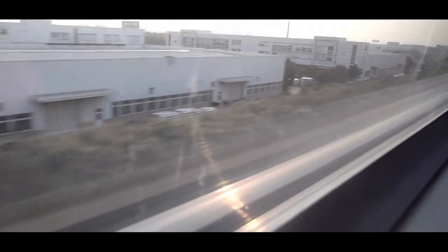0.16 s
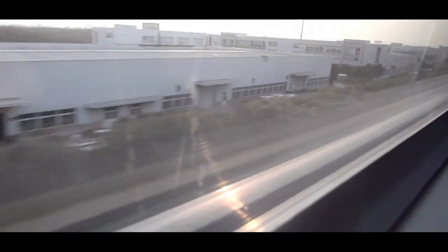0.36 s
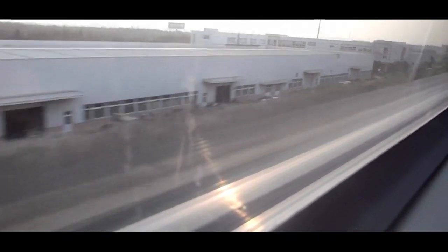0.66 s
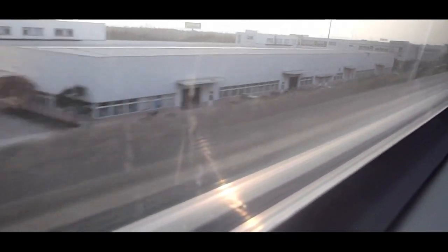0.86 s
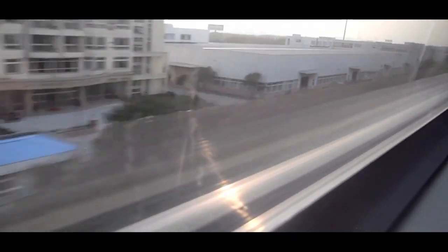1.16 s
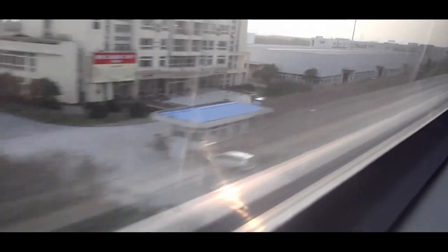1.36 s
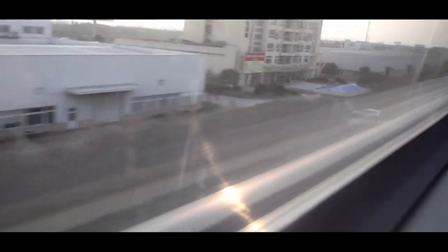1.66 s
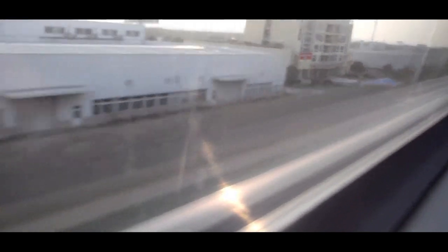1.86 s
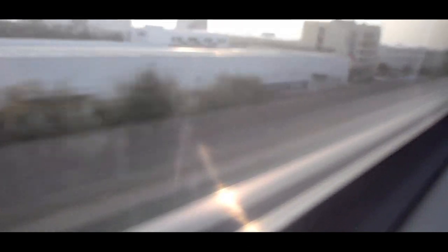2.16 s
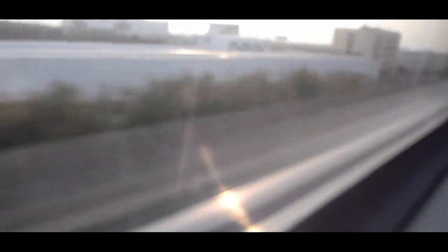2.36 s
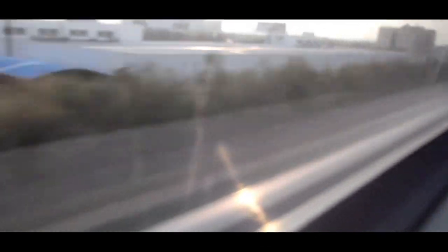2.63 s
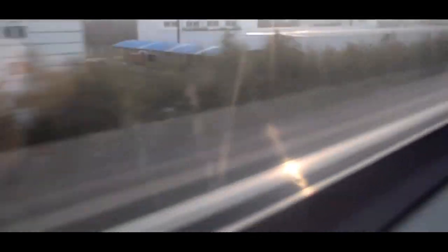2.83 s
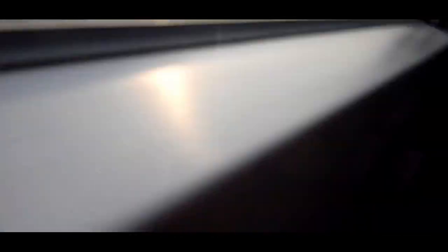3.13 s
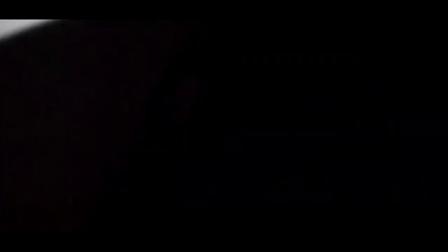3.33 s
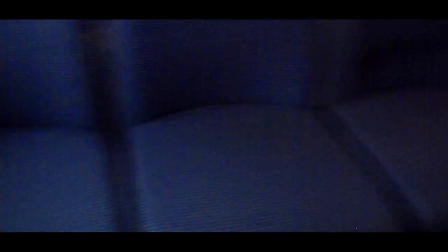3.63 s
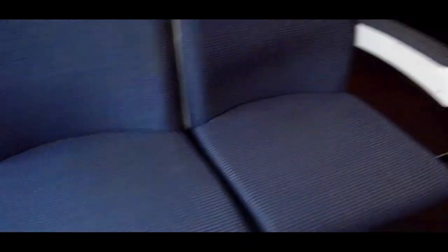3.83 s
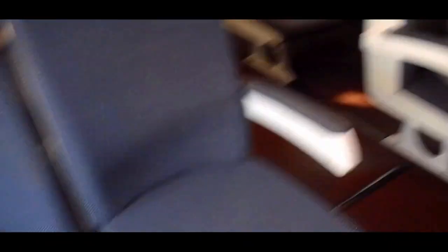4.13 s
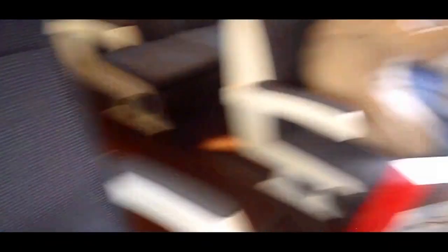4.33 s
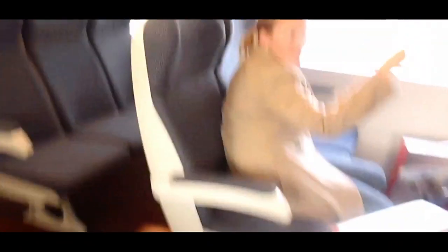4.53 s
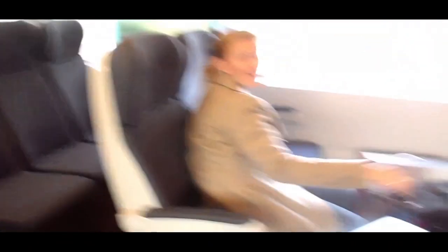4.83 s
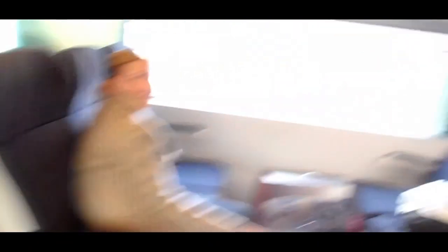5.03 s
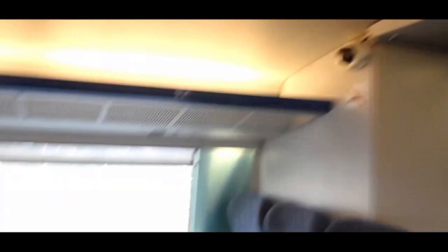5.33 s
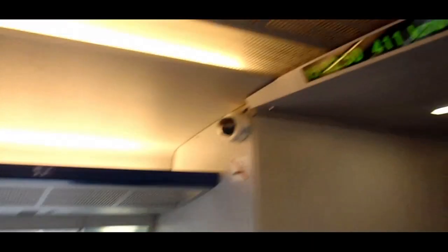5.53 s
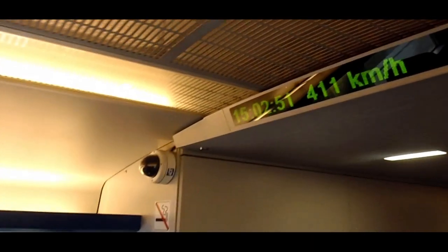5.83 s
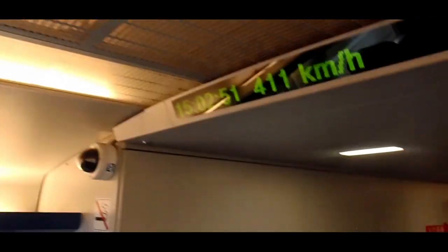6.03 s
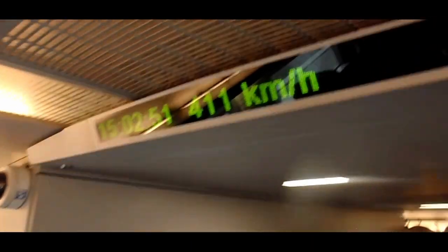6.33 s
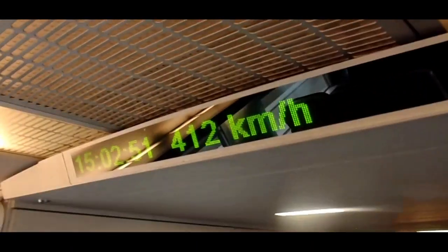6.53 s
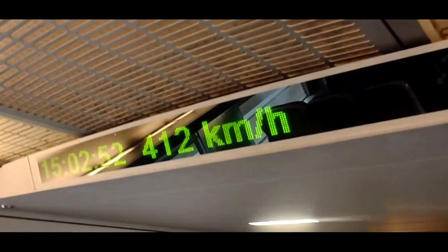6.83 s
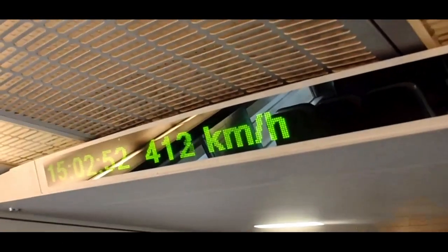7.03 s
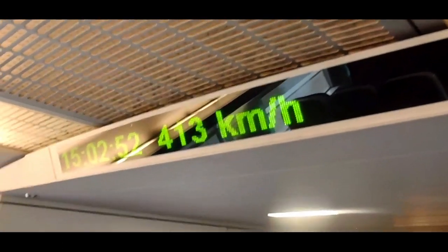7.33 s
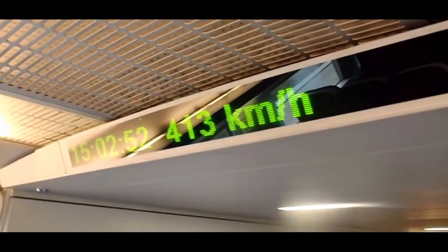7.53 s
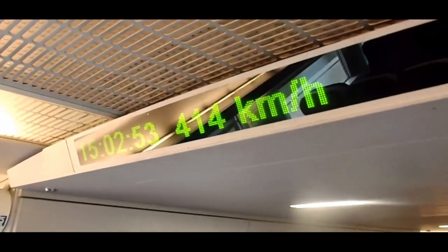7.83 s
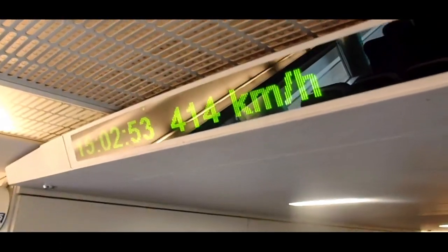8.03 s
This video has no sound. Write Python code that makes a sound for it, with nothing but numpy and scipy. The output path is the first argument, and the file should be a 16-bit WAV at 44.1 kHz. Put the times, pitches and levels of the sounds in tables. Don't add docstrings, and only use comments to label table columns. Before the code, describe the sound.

A close handheld microphone in an enclosed train cabin picks up heavy, bass-rich turbulence with quick small gusts. A faint steady tone climbs very slightly. Midway the hand shifts, causing scattered plastic snaps, creaks and a dull bump, and the roar is briefly muffled behind a seat. Afterwards handling fades, leaving rush, rumble and a stronger beating fan whine, with faint seat squeaks. Nobody speaks.

```python
import sys
import numpy as np
from scipy import signal
from scipy.fft import rfft, irfft, next_fast_len
from scipy.io import wavfile
from scipy.ndimage import uniform_filter1d

SR = 44100
rng = np.random.default_rng(int(sys.argv[2]) if len(sys.argv) > 2 else 0)


def field_ratio(decibels):
    return 10 ** (np.asarray(decibels, dtype=float) / 20)


def put_to_file(sound):
    columns = np.atleast_2d(sound).T
    safe = np.clip(columns, -1, 1)
    whole_steps = np.round(safe * 32767)
    wavfile.write(sys.argv[1], SR, whole_steps.astype(np.int16))


N = 360738
SIZE = next_fast_len(N)
HZ = np.fft.rfftfreq(SIZE, 1 / SR) + 1e-3
TIME = np.arange(N) / SR

# time_s, aisle_share
TURN = [
    (0, 0.05),
    (2.3, 0.06),
    (3.2, 0.2),
    (3.7, 0.44),
    (5.6, 0.86),
    (6.2, 0.91),
    (8.18, 0.8),
]
# pitch_hz, level_db (per Hz)
HULL_COLOUR = [(24, -27), (40, -11), (62, 0.5), (95, 0), (141, -6.5), (190, -6), (300, -11.5), (674, -27),
               (1100, -34), (2000, -46), (3800, -48), (4900, -69), (8000, -84), (15000, -106)]
AIR_HZ = (110, 550, 1800, 3700)
AISLE_CHANGE_DB = (-0.5, 1, 8, 5)
GUST_SHARE = (0.73, 0.97, 0.17, 0.75)
# middle_s, change_db, length_s
GUSTS = [(0.183, 5.5, .06), (0.619, 3, 0.13), (0.861, 4, 0.071), (0.949, 0, 0.42), (3.207, 0, 0.56),
         (4.049, 1, .25), (6.142, -1, .2), (1.121, 4, 0.11), (1.906, 5, 0.054), (2.118, -0.5, .1),
         (2.36, 6, .02), (2.69, 2.5, 0.14), (2.851, -5, .05), (.28, 2, .04), (0.386, 1.5, 0.036),
         (5.54, 3, 0.026), (7.755, 5, .02), (2.974, 2, 0.082), (3.331, 0.5, 0.076), (3.541, -6, 0.12),
         (3.844, 7.5, .06), (4.197, -3.5, 0.04), (4.636, 1.5, 0.026), (4.954, 1, .1), (5.288, -2, .15),
         (5.763, 4, 0.13), (5.854, 3, 0.021), (5.976, -3.5, 0.36), (6.437, 3.5, 0.089),
         (6.889, -5.5, 0.047), (6.959, 2, 0.091), (7.219, 2, 0.042), (7.44, 0, 0.039), (7.502, -7, 0.058),
         (7.695, 1, 0.085), (7.94, -2.5, .06)]
# middle_s, pitch_hz, change_db, length_s
LOCAL_SWELLS = [(.05, 200, -5, .2), (.36, 90, 10, .2), (.55, 115, -5, .12), (1.3, 190, -3, .3),
                (4.03, 90, -4, .15), (5.9, 200, -3, .2), (5, 1500, 2, .15), (.5, 450, -3, .2), (.8, 700, 3, .4),
                (1.65, 110, 4, .2), (2.03, 1300, -5, .15), (2.3, 160, 4, .5), (2.6, 105, -6, .8),
                (3.02, 65, 6, .15), (3.2, 450, -5, .5), (3.3, 190, -3, .15), (3.35, 105, 5, .3),
                (3.6, 300, 4, .2), (3.98, 200, 5, .3), (3.95, 1700, 2, .4), (4.5, 330, 4, .3), (4.5, 170, -3, .3),
                (4.9, 290, 3, .2), (4.8, 70, -3, .3), (4.9, 700, -3, .2), (5.1, 170, 3, .5), (5.3, 115, -5, .2),
                (5.3, 700, -3, .2), (5.55, 70, 3, .3), (5.6, 280, -1, .3), (6.25, 70, -4, .35),
                (6.75, 220, -3, .4), (7, 70, 4, .3), (7.1, 300, 4, .3), (7.1, 2500, 3, .35), (7.4, 180, -4, .4),
                (7.5, 700, -2, .2), (7.75, 65, -4, .4), (7.9, 250, 4, .2)]
# pitch_hz, width_hz, window_db, aisle_db
PANES = [(109.9, 10, -30, -26.5), (175.2, 30, -31, -44.5), (261, 32, -42, -33.5), (1700, 480, -59.5, -58),
         (477, 140, -50, -44.5), (1200, 90, -67.5, -49), (4370, 590, -86.5, -67), (2780, 380, -54, -85.5),
         (5600, 830, -84.5, -76), (2340, 130, -83, -72), (3546, 500, -68, -55), (7750, 300, -94, -97),
         (11700, 150, -100, -102)]
SLOT_HZ = (650.5, 673)
# middle_s, tone_db, octave_db
SLOT_SWELLS = [
    (1.8, -11.5, -1.5),
    (3.35, -1.5, 12.5),
    (3.799, 8, 3),
    (4.701, -4, 9.5),
    (5.67, 5, 13.5),
    (6.0, 8, 5),
    (7.25, 1.5, 3.5),
    (7.75, 2, 8.5),
]
# middle_s, level_db (over steady)
THUMPS = [(.5, -5), (1.2, -4), (1.41, -8), (1.95, 3.5), (2.46, 5), (3.05, 4), (3.75, 8), (3.96, 11.5),
          (4.8, 5), (5.22, 23), (5.88, 9), (6.3, 2), (7.2, 5), (7.45, 8)]
# time_s, level_db
FAN_LEVEL = [(0, -49.5), (.8, -47), (1.9, -53), (2.4, -46), (3.1, -55), (3.44, -50), (3.53, -56),
             (3.65, -52), (3.8, -50), (4.07, -46), (4.3, -44), (5.2, -46), (5.61, -44), (5.75, -38),
             (6.45, -34), (7.45, -36), (8.11, -35), (8.18, -47)]
# pitch_hz, wander_hz, window_db, aisle_db
FAN_LINES = [(1073, 3, 1, -24), (1082, 4, -10, -5), (1094, 3, -4, 0), (1105, 4, -4, -6), (1117, 4, -12, -2),
             (1129, 5, -16, -11), (1143, 5, -20, -20)]
# middle_s, length_s, pitch_hz, level_db
STANDOUTS = [(.3, .25, 1080, -48), (.8, .3, 1082, -47), (1.25, .3, 1080, -46), (2.3, .2, 1085, -48),
             (3.3, .15, 1065, -46), (3.43, .14, 1075, -42), (3.65, .11, 1101, -39), (4.03, .26, 1106, -41),
             (4.05, .34, 1080, -42), (4.2, .12, 1075, -45), (4.55, .2, 1090, -45), (4.58, .15, 1122, -47),
             (4.77, .2, 1075, -46), (4.8, .2, 1135, -48), (4.92, .06, 1120, -43), (5.33, .12, 1130, -45),
             (5.44, .08, 1097, -45), (5.7, .08, 1100, -41), (6.4, .3, 1095, -40), (6.2, .2, 1120, -37),
             (6.93, .25, 1095, -37), (7.1, .1, 1115, -39), (7.35, .2, 1115, -40), (7.25, .2, 1088, -42),
             (7.74, .1, 1105, -35), (8.05, .2, 1095, -41)]
# pitch_hz, width_hz, window_db, aisle_db
CIRCUIT = [(12900, 200, -108, -108), (15680, 60, -108, -108), (11800, 600, -101, -101),
           (9800, 2500, -100, -100)]
# time_s, level_db
GRIP = [(0, -81.5), (2.3, -78.5), (2.45, -74), (3.05, -75), (3.2, -74.5), (3.6, -82), (4.1, -69),
        (4.3, -74), (4.7, -72.5), (5.1, -72), (5.45, -68), (5.8, -76), (6.4, -72), (6.8, -82), (8.18, -85)]
# start_s, level_db
THUDS = [
    (0.163, -9),
    (2.699, -7),
    (5.84, -3.5),
]
# start_s, peak_db, pitch_hz
TICKS = [(0.185, -56, 5500), (0.4052, -62.5, 5500), (2.4164, -57, 6000), (2.4714, -65, 6500),
         (2.5017, -49, 4600), (2.592, -62, 7300), (2.592, -50, 4000), (3.0175, -58, 4600),
         (2.7157, -61, 6500), (3.0175, -59, 6500), (3.3134, -61, 6500), (3.6287, -62, 6500),
         (3.6704, -65, 6500), (3.8651, -56, 6500), (4.157, -65, 7000), (4.2403, -44, 5000),
         (4.3046, -53, 4700), (4.3103, -51, 4700), (4.6658, -59, 5700), (4.6947, -60, 5700),
         (5.2036, -60, 5800), (5.3707, -46, 4800), (5.4534, -55, 6000), (5.5363, -57, 5500),
         (6.0945, -67, 6000), (6.2063, -53, 6000), (6.3504, -61, 6000), (6.5585, -55, 6500)]
# start_s, peak_db, top_hz
SNAPS = [(0.186, -58, 9000), (2.5017, -62, 9000), (2.9834, -38, 13000), (3.8654, -57, 8000),
         (4.1572, -62, 8500), (4.2405, -66, 13000), (4.255, -54, 9000), (4.3044, -59, 12500),
         (4.3103, -57, 12500), (4.6656, -69, 10000), (5.118, -68, 9000), (5.198, -66, 10500),
         (5.212, -69, 12000), (5.3705, -58, 9000), (5.4418, -57, 14000), (5.5361, -60, 8000),
         (5.585, -72, 11000), (5.8853, -68, 8000), (6.2066, -61, 7500), (6.5588, -58, 9500),
         (6.6381, -69, 8000)]
# middle_s, length_s, level_db
RUBS = [(2.434, .03, -60.5), (2.972, .002, -50), (2.977, .002, -58), (2.983, 0.0094, -45.5),
        (3.657, 0.018, -57), (3.797, .04, -68), (4.271, 0.011, -60.5), (4.34, 0.024, -56),
        (4.357, 0.02, -54), (4.5, .03, -68), (4.55, .03, -68), (5.31, .03, -64), (5.444, .014, -51.5),
        (5.36, 0.044, -64), (5.675, .04, -62), (5.524, .04, -60.5), (5.54, .014, -54)]
# start_s, peak_db, knock_db, panel_db, sparkle_db
CRACKS = [(2.4409, -41, 6, 9, -21.5), (2.4457, -30.5, 5, 9, -28), (2.6534, -28.5, -14, 2, -23.5),
          (2.813, -37.5, 16, 3, -42), (2.8312, -32, -6, -3, -22), (2.9834, -19, -7, -14, -28),
          (2.989, -31, -6, 0, -30), (3.497, -28, 1, -8, -37), (3.5034, -47, -3, -5, -30),
          (3.654, -25.5, -12, -8, -28.5), (3.6598, -27, -7, -2, -24), (4.2545, -29, 4, -4, -35),
          (4.566, -38, 6, 2, -38), (5.1992, -38, -6, 1, -40.5), (5.443, -39, 6, -4, -20.5),
          (5.8395, -20, -3.5, 5, -26)]
# start_s, pitch_hz, peak_db
RINGS = [(2.4409, 2210, -43), (2.4457, 2250, -38), (2.4467, 3300, -32.5), (2.4457, 4520, -40),
         (2.4457, 1300, -39), (2.6512, 1010, -30.5), (2.6535, 1550, -24.5), (2.6534, 9300, -48),
         (2.6536, 3550, -29.5), (2.6515, 5600, -47), (2.653, 7600, -49), (2.814, 1550, -29),
         (2.814, 2870, -34), (2.8312, 760, -23.5), (2.8312, 1250, -30), (2.8312, 1870, -32),
         (2.8312, 2400, -34.5), (2.8312, 4300, -41), (2.8135, 3450, -37), (2.8135, 4200, -41),
         (2.9828, 1640, -32), (2.9832, 2600, -29), (2.9834, 3570, -25), (2.9836, 4890, -24),
         (2.9834, 6020, -33), (2.9834, 7000, -45), (2.9834, 7800, -43), (2.9836, 760, -18),
         (2.9831, 1250, -35), (2.9834, 11500, -45), (2.9834, 9500, -48), (3.496, 1490, -33.5),
         (3.498, 1900, -33), (3.497, 3730, -28.5), (3.497, 5000, -40.5), (3.497, 5930, -46),
         (3.496, 8580, -67), (3.655, 2830, -26.5), (3.654, 5240, -36.5), (3.654, 7000, -50),
         (3.66, 1120, -27), (3.6587, 2100, -40), (3.6591, 3870, -32.5), (3.6585, 5500, -39),
         (3.6594, 7040, -41), (3.6591, 9600, -52.5), (4.256, 1810, -32), (4.256, 3300, -36.5),
         (4.256, 5600, -46), (4.565, 1700, -28), (4.566, 3600, -42), (5.199, 2300, -36.5),
         (5.1992, 1500, -40), (5.443, 3660, -32), (5.443, 6000, -47.5), (5.839, 1440, -25),
         (5.8389, 2000, -27), (5.8395, 3360, -32.5), (5.8392, 4790, -37.5), (5.8397, 6000, -35.5),
         (5.84, 7670, -44.5), (5.8395, 11100, -51)]
# middle_s, length_s, pitch_hz, level_db
CHAFES = [
    (4.355, .04, 10500, -78),
    (4.565, .015, 10500, -79),
    (4.61, .02, 5600, -70),
    (4.7, .025, 5800, -67),
    (5.305, .02, 9300, -78),
    (5.33, .03, 11500, -81),
    (5.42, .06, 11000, -82),
    (5.455, .01, 11300, -76),
    (5.53, .05, 11000, -80),
    (5.55, .012, 6500, -65),
]
# middle_s, length_s, level_db
SQUEAKS = [
    (7.41, .05, -56),
    (7.52, 0.073, -59),
]


def curves(table):
    s, *columns = np.transpose(table)
    return [np.interp(TIME, s, column) for column in columns]


def bumps(times, heights, lengths):
    t = TIME[::32]
    events = np.broadcast(times, heights, lengths)
    total = sum(height * np.exp(-(2 * (t - s) / length) ** 2) for s, height, length in events)
    return np.interp(TIME, t, total)


def walk(rate):
    hold, steps = int(SR / rate), 24
    levels = np.repeat(rng.standard_normal(N // hold + 1), steps)
    smooth = uniform_filter1d(uniform_filter1d(levels, steps), steps)
    return 1.2 * np.interp(np.arange(N), np.arange(len(levels)) * hold / steps, smooth)


def noise(gain):
    x = irfft(rfft(rng.standard_normal(SIZE)) * gain, SIZE)[:N]
    return x / np.std(x)


def bell(hz, width_hz):
    return 1 / (1 + (2 * (HZ - hz) / width_hz) ** 2)


def band(x, lo_hz, hi_hz):
    return signal.sosfilt(signal.butter(3, (lo_hz, hi_hz), "bandpass", fs=SR, output="sos"), x)


def fade(t, t60):
    return np.exp(-np.log(1000) * t / np.clip(t60, .003, .06)) * np.clip(t / 0.00012, 0, 1)


def add(out, s, sound):
    start = int(s * SR)
    out[start:start + len(sound)] += sound


def air(turn):
    hz, db = np.transpose(HULL_COLOUR)
    colour = field_ratio(np.interp(np.log(HZ), np.log(hz), db, left=-200))
    swing_db = np.outer(AISLE_CHANGE_DB, turn - turn.mean())
    swing_db = swing_db + np.outer(GUST_SHARE, bumps(*np.transpose(GUSTS)))
    treble_eddy = 1.6 * np.tanh(walk(21))
    gust, sway = walk(30), 0.29 * walk(12)
    shared = np.array([walk(6) for _ in range(5)])
    s, local_hz, local_change_db, length = np.transpose(LOCAL_SWELLS)
    local = np.array([bumps([a], b, c)[::64] for a, b, c in zip(s, local_change_db, length)])
    out = np.zeros(N)
    for octave in np.arange(5, 14.1, 1 / 3):
        reach = np.exp(-((octave - np.log2(local_hz)) / 0.45) ** 2)
        local_db = np.repeat(reach @ local, 64)[:N]
        gain = colour * np.cos(np.pi / 2 * np.clip(3 * (np.log2(HZ) - octave), -1, 1))
        share = [np.interp(octave, np.log2(AIR_HZ), row) for row in np.eye(4)]
        near = np.clip(1 - np.abs(octave - np.arange(5, 14, 2)) / 2, 0, 1)
        treble = np.clip((octave - 7.5) / 5.2, 0, 1)
        db = local_db + share @ swing_db + 1.7 * treble * treble_eddy + 1.82 * gust
        db = db + sway + 0.45 * near @ shared + 0.6 * walk(7)
        out += noise(gain) * np.sqrt(np.sum(gain ** 2)) * field_ratio(db)
    return out / np.std(out) * field_ratio(-18.5)


def resonances(table, turn, flicker_db, rate):
    out = np.zeros(N)
    for hz, width_hz, window_db, aisle_db in table:
        db = window_db + turn * (aisle_db - window_db) + flicker_db * walk(rate)
        out += noise(bell(hz, width_hz)) * field_ratio(db)
    return out


def slots(turn):
    s, tone_db, octave_db = np.transpose(SLOT_SWELLS)
    swell_s = 0.55
    low_db = np.interp(turn, (0, 1), (-50, -54)) + bumps(s, tone_db, swell_s)
    high_db = np.interp(turn, (0, 1), (-71, -64)) + bumps(s, octave_db, swell_s)
    phase = 2 * np.pi * np.cumsum(np.linspace(*SLOT_HZ, N) + 2.5 * walk(14)) / SR
    return np.sqrt(2) * (field_ratio(low_db) * np.sin(phase) + field_ratio(high_db) * np.sin(2 * phase))


def buffet(turn):
    thump_s = 0.086
    db = np.interp(turn, (0, 1), (-26, -43.5)) + bumps(*np.transpose(THUMPS), thump_s)
    return noise(bell(41, 22) * np.clip(HZ / 25, 0, 1) ** 2) * field_ratio(db - 1.0)


def fan(turn):
    whine = np.zeros(N)
    for hz, wander_hz, window_db, aisle_db in FAN_LINES:
        phase = 2 * np.pi * np.cumsum(hz + 1.7 * wander_hz * walk(22)) / SR
        whine += field_ratio(window_db + turn * (aisle_db - window_db) + 0.75 * walk(18)) * np.sin(phase)
    span = int(0.08 * SR)
    power = uniform_filter1d(uniform_filter1d(whine ** 2, span), span)
    whine = whine / np.sqrt(power) * field_ratio(curves(FAN_LEVEL)[0])
    flutter = field_ratio(1.2 * walk(55))
    drift = np.cumsum(6.0 * walk(30)) / SR
    t = np.arange(-SR // 4, SR // 4) / SR
    lone = np.zeros(N + len(t))
    for s, length, hz, db in STANDOUTS:
        at = np.clip(int(s * SR) + np.arange(len(t)) - len(t) // 2, 0, N - 1)
        swell = np.sqrt(2) * field_ratio(db) * np.exp(-(2 * t / length) ** 2)
        add(lone, s + t[0], swell * np.sin(2 * np.pi * (hz * t + drift[at])))
    return (whine + lone[:N]) * flutter


def grip():
    grip_db = curves(GRIP)[0]
    creak_db = 2.6 * rng.exponential(size=N) + 3.5 * walk(25) + grip_db - 5.0
    creaks = (rng.random(N) < 450 / SR) * field_ratio(creak_db)
    out = 4.4 * band(creaks, 4300, 7200) + 0.8 * band(creaks, 8000, 14000)
    rustle_db = grip_db - 4
    out += noise(bell(5800, 3500) ** 2) * field_ratio(rustle_db + 3.0 * walk(30))
    out += noise(bell(10500, 5000) ** 2) * field_ratio(rustle_db - 18 + 4.0 * walk(40))
    return out


def thuds():
    t, out = np.arange(4096) / SR, np.zeros(N)
    thud_hz, t60 = 98, 0.12
    fall = np.exp(-np.log(1000) * t / t60) * np.clip(t / 0.0065, 0, 1)
    for s, db in THUDS:
        add(out, s, field_ratio(db) * np.sin(2 * np.pi * thud_hz * t) * fall)
    return out


def ticks():
    t, out = np.arange(2048) / SR, np.zeros(N)
    fall = fade(t, 0.015)
    for s, db, hz in TICKS:
        snap = rng.standard_normal(len(t)) * fall
        spark = field_ratio(-20) * band(snap * fall, 8000, 14300)
        add(out, s, 1.7 * field_ratio(db) * (band(snap, .78 * hz, 1.2 * hz) + spark))
    return out


def seam():
    t, out = np.arange(4096) / SR, np.zeros(N)
    for s, db, top_hz in SNAPS:
        snap = np.sign(rng.standard_normal(len(t))) * fade(t, 0.005)
        add(out, s, 2.5 * field_ratio(db) * band(snap, 3500, top_hz))
    return out


def rubs():
    t, out = np.arange(2048) / SR, np.zeros(N)
    for s, length, db in RUBS:
        catch, grit = rng.standard_normal((2, len(t)))
        catch_db = 2.2 * uniform_filter1d(catch, size=40) * np.sqrt(40)
        slide = grit * np.exp(-((t - t.mean()) / (.5 * length)) ** 2) * field_ratio(catch_db)
        add(out, s - t.mean(), field_ratio(db) * (band(slide, 3000, 6500) + 0.21 * band(slide, 8500, 12500)))
    return out


def cracks():
    t, out, t60 = np.arange(1024) / SR, np.zeros(N), 0.015
    thump = np.exp(-t / 0.0021) * np.sin(2 * np.pi * 720 * t)
    for s, db, knock_db, panel_db, sparkle_db in CRACKS:
        slip = np.sign(rng.standard_normal(len(t))) * fade(t, t60)
        shell = 1.7 * band(slip, 2300, 4840)
        panel = 4.0 * field_ratio(panel_db) * band(slip, 1400, 2100)
        edge = band(slip * fade(t, t60), 5300, 8500) + 0.41 * band(slip * fade(t, .6 * t60), 10000, 14500)
        snap = (shell + panel + 3.5 * field_ratio(sparkle_db) * edge) * field_ratio(-3.5)
        knock = 2.0 * field_ratio(knock_db + 2.5) * band(thump + 0.83 * slip, 550, 1400)
        add(out, s, field_ratio(db) * (snap + knock))
    return out


def rings():
    t, out = np.arange(1024) / SR, np.zeros(N)
    for s, hz, db in RINGS:
        t60 = 0.023 / (1 + hz / 3000 / 2)
        add(out, s, field_ratio(db) * np.sin(2 * np.pi * hz * t) * fade(t, t60))
    return out


def shaded(cabin):
    bass = 1 / (1 + (HZ / 191) ** 2)
    leak = 0.37 / (1 + (2600 / HZ) ** 4)
    kept = irfft(rfft(cabin, SIZE) * (bass + leak), SIZE)[:N]
    shade_s, length_s, shade_db = 3.13, 0.16, -9
    return kept + (cabin - kept) * field_ratio(bumps([shade_s], shade_db, length_s))


def chafes():
    t, out = np.arange(4096) / SR, np.zeros(N)
    for s, length, hz, db in CHAFES:
        swell = np.exp(-(2 * (t - t.mean()) / length) ** 2)
        grain = rng.standard_normal(len(t)) ** 3 * swell
        add(out, s - t.mean(), field_ratio(db) * band(grain, .9 * hz, 1.1 * hz))
    return out


def squeaks():
    s, length, db = np.transpose(SQUEAKS)
    phase = 2 * np.pi * np.cumsum(4100 + 15 * walk(30)) / SR
    return bumps(s, field_ratio(db), length) * np.sin(phase)


def scene():
    turn = np.clip(curves(TURN)[0], 0, 1)
    outside = air(turn) + resonances(PANES, turn, 1.5, 25) + slots(turn)
    cabin = shaded(outside) + buffet(turn) + fan(np.maximum.accumulate(turn) ** 2)
    circuit = resonances(CIRCUIT, turn, 1.6, 15)
    hand = grip() + thuds() + ticks() + seam() + rubs() + cracks() + rings() + chafes()
    return (cabin + circuit + hand + squeaks())[None]


def low_pass(x):
    return signal.sosfilt(signal.butter(12, 15700, fs=SR, output="sos"), x)


def record(dry):
    limit = .446
    x = dry / limit
    flat = limit * x / (1 + np.abs(x) ** 12) ** (1 / 12)
    return low_pass(flat)


dry = scene()
out = record(dry)
put_to_file(out)
```